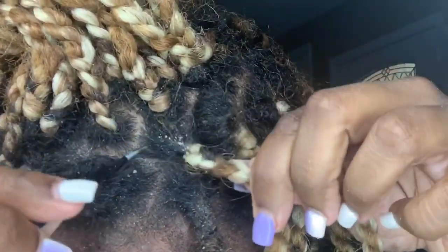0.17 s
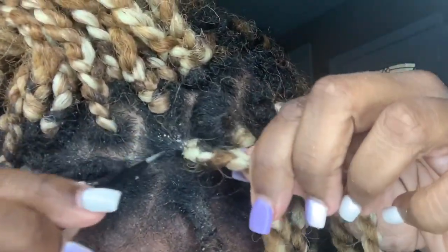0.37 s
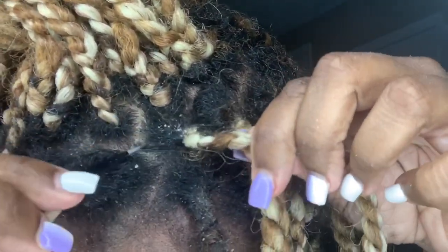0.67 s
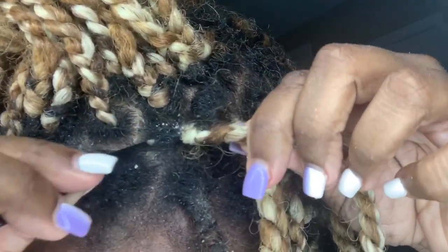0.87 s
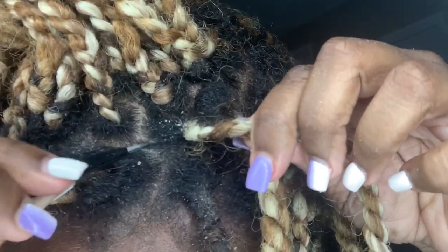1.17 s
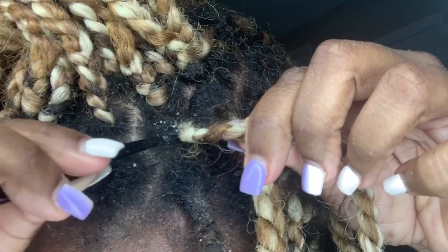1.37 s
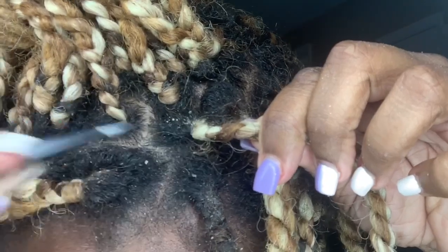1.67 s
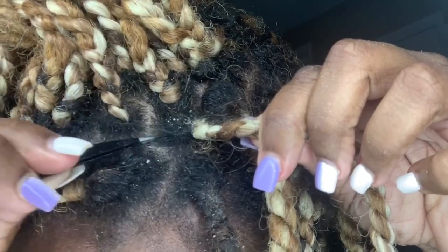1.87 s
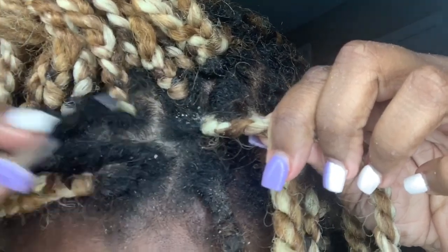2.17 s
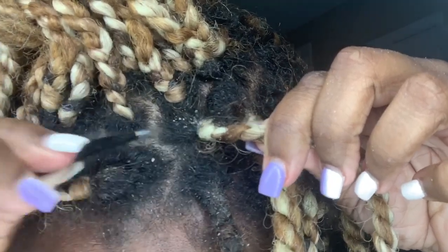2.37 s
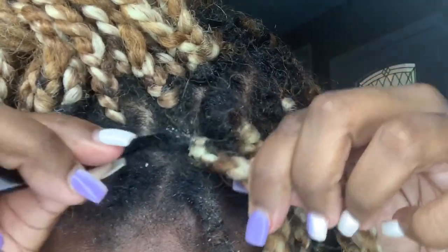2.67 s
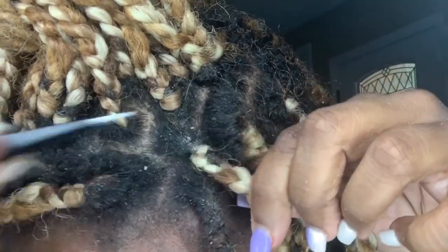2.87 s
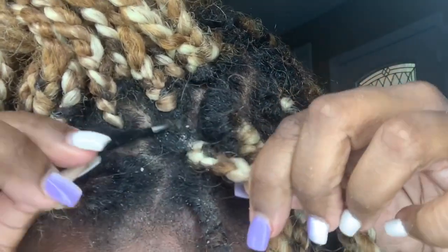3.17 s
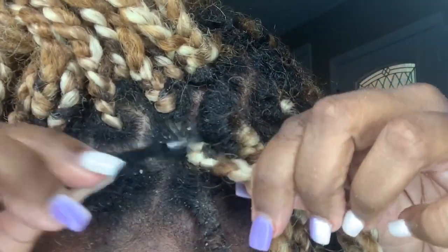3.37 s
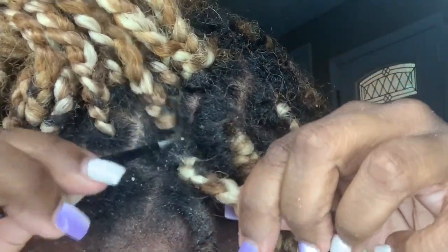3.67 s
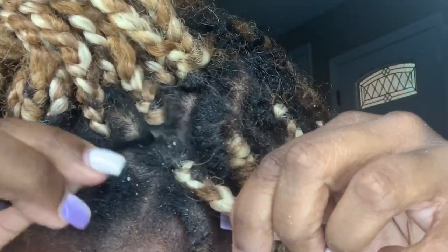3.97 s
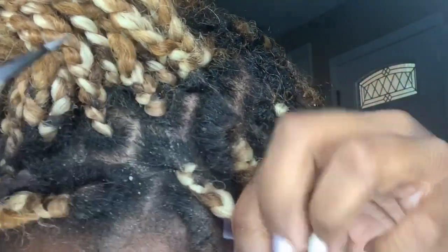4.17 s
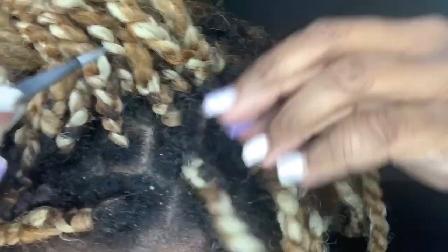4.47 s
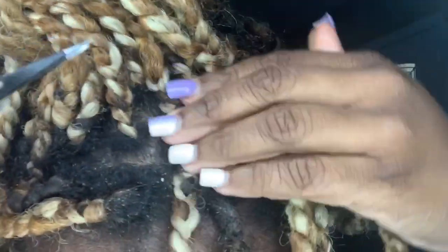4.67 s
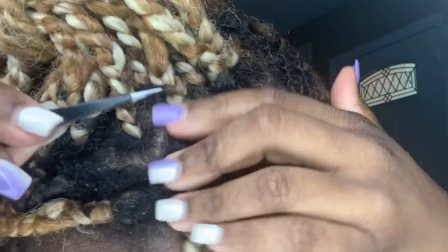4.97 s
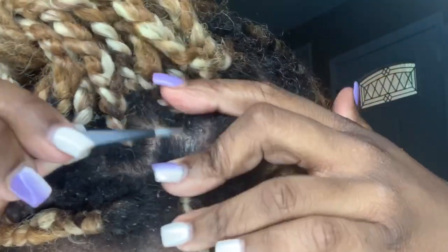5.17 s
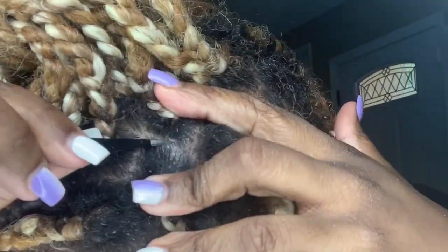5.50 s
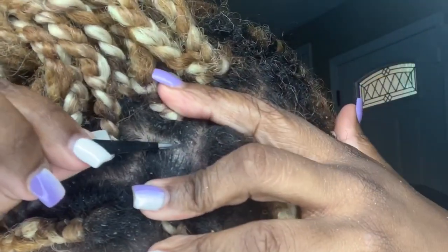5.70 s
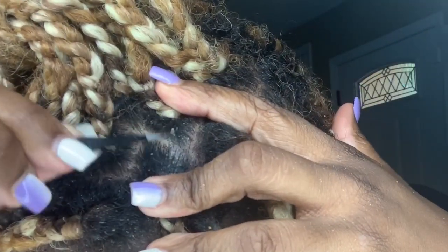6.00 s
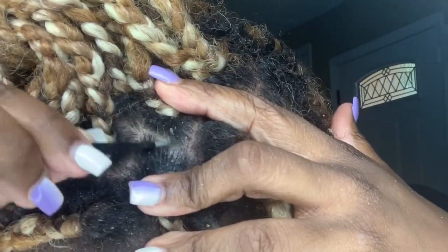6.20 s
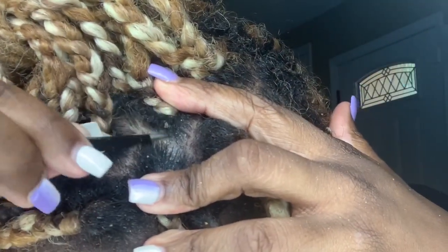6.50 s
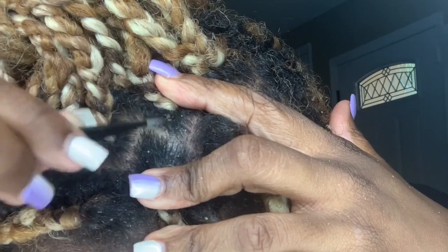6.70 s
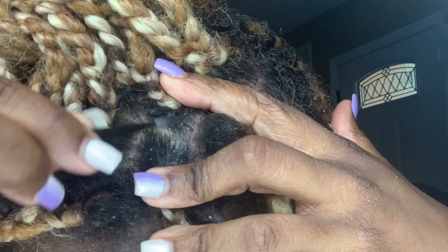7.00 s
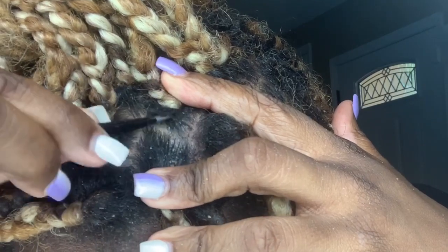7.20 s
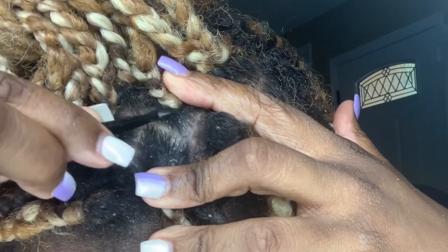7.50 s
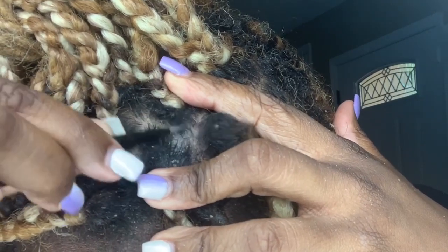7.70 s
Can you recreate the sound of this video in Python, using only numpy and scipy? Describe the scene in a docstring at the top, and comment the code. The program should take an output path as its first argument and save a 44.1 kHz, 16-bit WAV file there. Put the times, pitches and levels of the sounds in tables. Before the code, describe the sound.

A plastic pick scratches a dry scalp very close to paired microphones, a little nearer the left, in a small room with a short faint tail. A fan hums low and steadily with a dull rush of air throughout. From 0.1 s come short, thin, bright scrapes with fine grit and tiny ticks, a firmer one near 0.65. At 1.55 a tangle rasps and snaps; smaller releases follow near 2.0 and 2.2. The sharpest snap lands at 2.9, another tug at 3.45, then a crackling cluster at 3.74-3.78. Light scrapes continue to 4.2. From 4.35 to 5.3 a hand brushes the braids in soft, uneven hisses. Fainter scratching returns at 5.35, with a crisp burst around 5.95 and a firm scrape at 6.3. A barely audible strand squeak comes near 6.55, then light strokes and ticks until a small snap at 7.8.

```python
"""A plastic pick scratches a dry scalp between braids, a hand's width from a pair of microphones.
Each stroke is noise and tiny slips ringing the pick's modes; tangles add growing rasps that suddenly give way.
Snapping hairs and flakes kick the pick into a short ping; a strand squeaks and loose hairs tick faintly.
Past the middle a hand brushes the braids, a soft hiss of filtered noise.
Behind it a fan hums in the small room: a sine, narrow drones and a dull rush of noise."""
import sys
import numpy as np
from scipy import signal
from scipy.fft import rfft, irfft
from scipy.io import wavfile
from scipy.ndimage import uniform_filter1d

SR = 44100
rng = np.random.default_rng(int(sys.argv[2]) if len(sys.argv) > 2 else 0)


def dump(signal):
    """Clip the signal to [-1, 1] and save it as 16-bit WAV at the path in sys.argv[1]."""
    limited = np.clip(np.atleast_2d(signal).T, -1, 1)
    pcm = np.round(limited * 32767).astype(np.int16)
    wavfile.write(sys.argv[1], SR, pcm)


N = 346185  # length in samples
TAPS = 1024  # length of a ring in samples
BINS = np.fft.rfftfreq(TAPS, 1 / SR)  # Hz
# the tip rings lower while the braid is held taut, higher once the hand has moved
REGRIP_S, TIP_BEFORE_HZ, TIP_AFTER_HZ = 4.5, 12100, 14200
HARDEST = 0.65  # share of a stroke after which it presses hardest


def gain_of(db):
    """Decibels to a factor."""
    return 10 ** (np.asarray(db) / 20)


def evened(x):
    """Scales to rms 1."""
    return x / np.sqrt(np.mean(x ** 2) + 1e-20)


def read(points, hz):
    """Reads a table of (Hz, value) on a log-frequency axis."""
    f, value = np.transpose(points)
    return np.interp(np.log(hz + 1), np.log(f + 1), value)


def add(mix, s, sound):
    """Mixes a sound in at time s."""
    part = mix[..., max(round(s * SR), 0):][..., :sound.shape[-1]]
    part += sound[..., :part.shape[-1]]


def bell(f, hz, width):
    """Magnitude of one resonance."""
    return 1 / np.sqrt(1 + (2 * (f - hz) / width) ** 2)


def causal(gain):
    """Minimum-phase ring: the most promptly decaying causal response with this magnitude."""
    both_sides = np.r_[gain, gain[-2:0:-1]]
    log_gain = np.log(np.maximum(both_sides, 1e-5))
    return np.fft.ifft(np.exp(np.conj(signal.hilbert(log_gain)))).real


def swell(start, end, edge_db, lead=0.27, linger=0.54, fade_db=-20):
    """Pressure creeps up to its hardest point and eases off; a light touch leads in and lingers after."""
    length = end - start
    share = np.arange(-lead, 1 + linger, 1 / (length * SR))
    corners = [-lead, 0, HARDEST, 1, 1 + linger]
    db = np.interp(share, corners, [edge_db + fade_db, edge_db, 0, edge_db, edge_db + fade_db])
    return start - lead * length, gain_of(db)


def slips(n, per_s, spread_db):
    """Random tiny jerks of uneven size, rms 1 on average."""
    sign, size, chance = rng.choice([-1, 1], n), rng.exponential(1, n), rng.random(n)
    jerks = sign * evened(gain_of(spread_db * np.minimum(size, 3)))
    return jerks * (chance < per_s / SR) * np.sqrt(SR / per_s)


# The pick's resonances, before each ring shifts and rebalances them.
# Each row: centre in Hz, nominal width in Hz, relative level in dB.
PICK_MODES = [(1332, 1000, -13.5), (2010, 330, -17), (3433, 410, -11), (4975, 1000, -15), (6616, 380, 0),
              (8070, 890, -12.5), (9300, 1100, -9.5), (10360, 590, -16), (12300, 750, -9),
              (15000, 230, -4.5), (14700, 590, -8)]


def pick_ring(body_db, tip_hz, tip_db, tip_width_hz, vary_db=9.5, shift=0.013, knee_hz=10000,
              skirt=1.5, blur=4.3, deepen=0.25, firm_db=-4):
    """The pick's modes plus the ping of its tip; rows: toward the left, toward the right, all around."""
    widen = np.array([[1], [1], [blur]])  # summed over all directions the peaks are flatter
    power = (gain_of(tip_db) * bell(BINS, tip_hz, tip_width_hz) ** 2) ** 2
    for hz, width, db in PICK_MODES:
        # each grip shifts a mode a little, and each direction hears it at its own strength
        pitch = hz * (1 + shift * rng.standard_normal())
        strength = gain_of(db + vary_db * rng.standard_normal((3, 1)))
        power = power + (strength * bell(BINS, pitch, width * widen) ** skirt) ** 2 / widen
    # a light touch hardly reaches the lowest modes
    octaves_down = np.log2(7000 / np.clip(BINS, 1500, 7000))
    power = power * gain_of(deepen * min(body_db - firm_db, 0) * octaves_down) ** 2
    # body and treble split at the knee, then balanced against each other
    low = 1 / (1 + (BINS / knee_hz) ** 20)
    body, treble = (part / part.sum(1, keepdims=True) for part in (power * low, power * (1 - low)))
    magnitudes = np.sqrt(gain_of(body_db) ** 2 * body + treble)
    rings = np.array([causal(gain) for gain in magnitudes])
    return rings / np.linalg.norm(rings, axis=1, keepdims=True)


# Strokes of the pick; scrapes() trims both levels.
# Each row: start in seconds, end in seconds, level in dB, body in dB relative to the treble.
STROKE_TIMES = [(0.102, 0.13, -56, -5), (0.184, 0.273, -63.5, -7), (.355, 0.478, -65, -3),
                (0.484, 0.583, -57.5, -1), (0.616, 0.696, -49, -4), (0.881, 1.009, -65, -4),
                (1.051, 1.184, -62, -3), (1.279, 1.414, -60.5, -4), (1.478, 1.545, -53, 3),
                (1.962, 2.068, -62, -7), (2.158, 2.248, -57, -4), (2.593, 2.762, -58.5, -3.5),
                (2.815, 2.883, -58, -3), (3.267, 3.377, -62.5, -5), (3.577, 3.657, -69, -5),
                (3.738, 3.776, -43, 2.5), (4.007, 4.119, -60.5, -0.5), (4.128, 4.173, -48, 1.5),
                (5.338, 5.513, -70, 0), (5.58, 5.706, -74.5, 2), (5.805, 5.879, -52, -8),
                (5.94, 5.997, -46.5, -2), (6.283, 6.391, -49, -7), (6.601, 6.669, -63, -2),
                (6.675, 6.746, -63, 0), (6.91, 6.957, -59.5, -.5), (6.97, 7.041, -61.5, 1),
                (7.204, 7.328, -64.5, 0), (7.472, 7.59, -61.5, -2), (7.692, 7.724, -70, -11),
                (7.758, 7.834, -61, 8)]


def scrapes(level_db=-1, body_db=-2, slips_per_s=300, spread_db=4, grit=0.53, grit_db=-66,
            grit_rise=0.15, catches_per_s=70, catch_db=-2, uneven_db=3.5):
    """The dragged tip rubs smoothly when light, breaks into slips when pressed, and catches hairs."""
    out = np.zeros((3, N))
    for start, end, db, body in STROKE_TIMES:
        first, pressure = swell(start, end, edge_db=-10)
        n = len(pressure)
        wander = evened(uniform_filter1d(rng.standard_normal(n), size=500))
        pressure = pressure * evened(gain_of(uneven_db * wander))
        catches = gain_of(catch_db) * slips(n, catches_per_s, spread_db=1.0)
        jerks = slips(n, slips_per_s, spread_db) + catches
        roughness = grit * gain_of(grit_rise * (db - grit_db))  # louder strokes are grittier
        rub = evened(rng.standard_normal(n) + roughness * jerks)
        tip_hz = TIP_BEFORE_HZ if start < REGRIP_S else TIP_AFTER_HZ
        ring = pick_ring(body + body_db, tip_hz, tip_db=-4, tip_width_hz=1300, vary_db=4.0, firm_db=-4.0)
        add(out, first, gain_of(db + level_db) * signal.fftconvolve((rub * pressure)[None], ring, axes=1))
    return out


# The tip hooks a tangle and tears through it; tugs() trims level and body.
# Each row: moment it gives way in seconds, level in dB, body in dB relative to the treble,
# weakening of the low modes in dB (a quarter of it per octave from 7 kHz to 1.5 kHz, none below zero).
TANGLES = [(1.547, -24, -0.5, 15), (2.203, -38, -4.5, 11), (2.893, -24.5, -1.5, 0), (3.451, -38.5, -4, -8),
           (3.774, -32, 0, 4), (5.984, -40, -3.5, -2.5)]


def tugs(level_db=-1, body_db=-1.5, build_db_per_s=1800, release_db_per_s=3500, grit=0.47, tip_hz=13800):
    """A dense rasp grows as the tangle tightens and dies off faster once it gives way."""
    out, t = np.zeros((3, N)), np.arange(-.03, .02, 1 / SR)
    strain = gain_of(np.minimum(build_db_per_s * t, -release_db_per_s * t))
    for s, db, body, weakening in TANGLES:
        rasp = evened(rng.standard_normal(len(t)) + grit * slips(len(t), per_s=1400, spread_db=1))
        ring = pick_ring(body + body_db, tip_hz, tip_db=-3.5, tip_width_hz=1500, vary_db=3.0,
                         firm_db=body + body_db + weakening)
        add(out, s + t[0], gain_of(db + level_db) * signal.fftconvolve((rasp * strain)[None], ring, axes=1))
    return out


# A hair or flake snaps off the tip; snaps() trims peak and body.
# Each row: start in seconds, peak in dB, pitch of the tip's ping in Hz, body in dB relative to the treble.
SNAP_TIMES = [(.216, -48, 14700, -12), (.228, -44, 14300, -14), (.353, -34, 11360, -11),
              (.512, -34, 11900, -15.5), (.548, -53, 11800, -4), (.684, -41, 14100, -10),
              (0.7062, -43.5, 14300, -9), (1.169, -51, 13800, -12), (1.495, -47, 11700, -6),
              (1.5283, -35, 13100, -7), (1.540, -33, 13900, -10), (1.5452, -24.5, 11650, -12),
              (2.042, -37, 11760, -14.5), (2.205, -32, 12350, -9.5), (2.234, -44, 12400, -4),
              (2.581, -53.5, 11600, -7), (2.637, -46.5, 11700, -17), (2.747, -52, 12200, -17),
              (2.828, -42, 13850, -18), (2.8403, -36.5, 12800, -10), (2.8925, -16.5, 14400, -15.5),
              (3.4353, -43, 13900, -10), (3.449, -31.5, 14300, -5.5), (3.6434, -54, 12300, -17),
              (3.742, -25, 14400, -12), (3.7482, -25, 12700, -10), (3.7717, -22, 14000, -8.5),
              (3.7756, -19.5, 13800, -10), (4.024, -47, 14300, -10), (4.1633, -35, 12300, -20),
              (4.2457, -54.5, 13800, 3), (5.4513, -60, 14700, -11.5), (5.815, -43, 15000, -11),
              (5.838, -36.5, 14900, -15), (5.946, -42, 14300, -12), (5.9743, -30, 14200, -7.5),
              (5.9836, -28.5, 14000, -12), (5.995, -34, 14900, -7.5), (6.2774, -43.5, 14800, -12),
              (6.369, -45.5, 14700, -7.5), (6.644, -54.5, 13900, 0), (6.708, -54, 13700, -7),
              (6.733, -53.5, 14700, 7), (6.997, -43.5, 13800, -8.5), (7.301, -52, 14020, -13),
              (7.319, -51, 13800, -10), (7.525, -37, 13500, -7), (7.759, -47.5, 14000, -5),
              (7.7765, -41, 14150, -5), (7.8165, -31.5, 14000, -8)]


def snaps(level_db=-0.5, body_db=1, kick=0.61, tear=0.23, tear_s=.0005, chatter_s=0.012, chatter_db=-13):
    """Each release is a sharp kick with a brief tear, then a faint chatter as the tip lands again."""
    out, t = np.zeros((3, N)), np.arange(TAPS // 2) / SR
    tearing = t / tear_s * np.exp(1 - t / tear_s)
    chatter = gain_of(chatter_db) * np.exp(-t / chatter_s)
    shape = tear * (tearing + chatter)
    grains = rng.standard_normal((len(SNAP_TIMES), len(t)))
    for (s, db, hz, body), grain in zip(SNAP_TIMES, grains):
        force = grain * shape
        force[np.argmax(shape)] += kick
        # the tear is broadband: it smears the kick in time but leaves the colour to the pick
        spectrum = rfft(np.pad(force, (0, len(t))))
        smooth_power = uniform_filter1d(abs(spectrum) ** 2, size=41)
        force = irfft(spectrum / np.sqrt(smooth_power))[:len(t)]
        modes = pick_ring(body + body_db, hz, tip_db=-0.5, tip_width_hz=1127, vary_db=3.5)
        ring = signal.fftconvolve(force[None], modes, axes=1)
        # peak of the rms over 1 ms, both sides together
        peak = np.sqrt(uniform_filter1d((ring[:2] ** 2).mean(0), size=44).max())
        add(out, s, gain_of(db + level_db) * ring / peak)
    return out


def squeak(start=6.52, end=6.63, hz=3300, width_hz=200, db=-78):
    """A strand squeaks faintly against the pick: noise narrowed to one resonance."""
    first, pressure = swell(start, end, edge_db=-1)
    n = len(pressure)
    f = np.fft.rfftfreq(n, 1 / SR)
    whistle = irfft(rfft(rng.standard_normal(n)) * bell(f, hz, width_hz) ** 2, n)
    out = np.zeros(N)
    add(out, first, gain_of(db) * evened(whistle) * pressure)
    return out


def stir(level_db=-91, body_db=-3, ticks_per_s=9, tip_hz=14300):
    """All the way through, a loose hair now and then ticks faintly against the pick."""
    ring = pick_ring(body_db, tip_hz, tip_db=-6, tip_width_hz=1500, vary_db=0.5)
    ticks = slips(N, ticks_per_s, spread_db=3.0)
    return gain_of(level_db) * signal.fftconvolve(ticks[None], ring, axes=1)[:, :N]


# The hand brushes the braids; brushes() trims the level.
# Each row: start in seconds, end in seconds, level in dB, tilt above 2.5 kHz in dB per octave.
BRUSH_TIMES = [(4.35, 4.511, -68.5, 1.5), (4.521, 4.735, -68.5, -10), (4.722, 4.971, -68.5, 6.5),
               (5.002, 5.139, -67, 5), (5.171, 5.278, -70.5, 5.5)]
# Colour of hair sliding under the fingers, before the tilt. Each row: frequency in Hz, relative level in dB.
HAIR_COLOUR = [(500, -28.5), (1500, -4.5), (3000, 6.5), (6000, 3), (10000, -1.5), (13000, -6), (15000, -1),
               (16500, -15)]


def brushes(level_db=-0.5, patchy_db=2):
    """Many hairs slide at once under the fingers: a soft, slightly uneven hiss."""
    out = np.zeros(N)
    for start, end, db, tilt in BRUSH_TIMES:
        first, pressure = swell(start, end, edge_db=-10)
        noise, patches = rng.standard_normal((2, len(pressure)))
        noise = noise * gain_of(patchy_db * evened(uniform_filter1d(patches, size=120)))
        octaves_up = np.log2(np.maximum(BINS, 2500) / 2500)
        colour = causal(gain_of(read(HAIR_COLOUR, BINS) + tilt * octaves_up))
        hiss = evened(signal.fftconvolve(noise, colour)[:len(noise)])
        add(out, first, gain_of(db + level_db) * hiss * pressure)
    return out


# The room's decay. Each row: frequency in Hz, time to fall by 60 dB in seconds.
ROOM_DECAY = [(1000, .35), (4000, 0.293), (8000, 0.23), (12000, 0.24), (16000, 0.099)]


def room(x, wet_db=-15, top_db=-5, build_s=.005):
    """A diffuse tail of decaying noise for each side, the treble weaker and the highest dying first."""
    hz, t, z = signal.stft(rng.standard_normal((2, SR // 2)), SR, nperseg=256)
    colour = np.interp(hz, [7000, 15000], [0, top_db])[:, None]
    decay = 60 * t / read(ROOM_DECAY, hz)[:, None]
    tail = signal.istft(z * gain_of(colour - decay), SR, nperseg=256)[1]
    tail = tail * (1 - np.exp(-np.arange(tail.shape[1]) / SR / build_s))
    return gain_of(wet_db) * signal.fftconvolve(x[None], tail / np.linalg.norm(tail[0]), axes=1)[:, :N]


# Colour of the fan's rush of air. Each row: frequency in Hz, relative density in dB per Hz.
AIR_COLOUR = [(15, -16.5), (35, -11.5), (55, -4), (85, -4.5), (110, -4.5), (135, -8.5), (185, -9),
              (215, -19), (245, -16), (330, -21), (450, -13.5), (620, -25), (720, -22), (820, -31),
              (1000, -26.5), (1400, -33.5), (2000, -42.5), (3200, -44), (4500, -50), (8000, -55),
              (16000, -64)]
# The fan's drones. Each row: centre in Hz, width at half amplitude in Hz, rms level in dB.
FAN_DRONES = [(60.6, 9.1, -54.5), (72.3, 9.3, -52.5), (105.9, 8.2, -49.5), (153, 12, -53), (400, 18, -63),
              (896, 90, -69.5)]
# Left-right likeness of the fan's noise. Each row: frequency in Hz, likeness from 0 to 1.
FAN_LIKENESS = [(100, 0.98), (200, 0.88), (350, 0.84), (700, 0.88), (1400, 0.2), (3000, 0.1), (16000, 0)]
AIR_DB = -48  # rms level
HUM_HZ, HUM_DB = 120.1, -45.5  # the hum's level is rms


def fan(lead_s=0.00018):
    """A steady motor hum, narrow drones and a dull rush of air, the left side leading."""
    f = np.fft.rfftfreq(N, 1 / SR)
    a, b = rng.standard_normal((2, len(f))) + 1j * rng.standard_normal((2, len(f)))
    power = (gain_of(AIR_DB) * evened(gain_of(read(AIR_COLOUR, f)))) ** 2
    for hz, width, db in FAN_DRONES:
        power = power + (gain_of(db) * evened(bell(f, hz, width) ** 2)) ** 2
    same = np.clip(read(FAN_LIKENESS, f), 0, 1)
    right = (same * a + np.sqrt(1 - same ** 2) * b) * np.exp(-2j * np.pi * f * lead_s)
    noise = irfft(np.array([a, right]) * np.sqrt(power * N / 2), N)
    t = np.arange(N) / SR - np.array([[0], [lead_s]])
    hum = gain_of(HUM_DB) * np.sqrt(2) * np.sin(2 * np.pi * HUM_HZ * t)
    return noise + hum


# How much later the right microphone hears the scalp. Each row: frequency in Hz, delay in seconds.
RIGHT_LAG = [(1000, .00033), (6000, .00036), (11000, .0004), (16000, .000405)]


def scene():
    """The scalp is nearer the left microphone, which hears it a little earlier."""
    left, right, around = scrapes() + tugs() + snaps() + squeak() + stir() + brushes()
    f = np.fft.rfftfreq(N, 1 / SR)
    later = np.exp(-2j * np.pi * f * read(RIGHT_LAG, f))
    direct = np.array([left, irfft(rfft(right) * later, N)])
    return direct + room(around) + fan()


def record(dry, edge_hz=16050):
    """The recorder's band limit: a steep low-pass."""
    low_pass = signal.firwin(255, edge_hz, window=("kaiser", 9), fs=SR)
    return signal.oaconvolve(dry, low_pass[None], "same")


dry = scene()
out = record(dry)
dump(out)
```